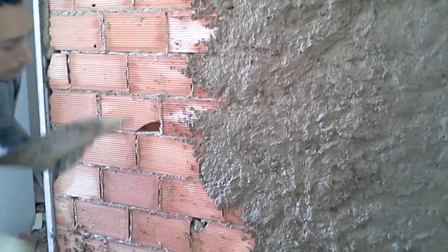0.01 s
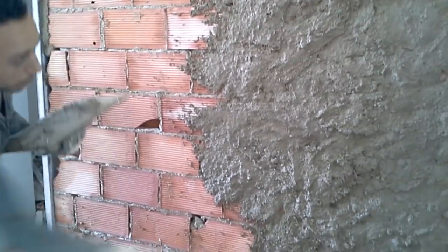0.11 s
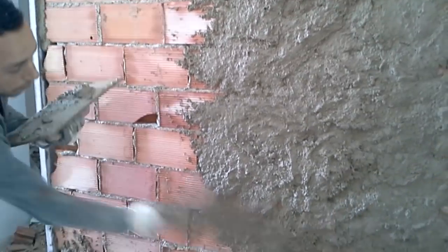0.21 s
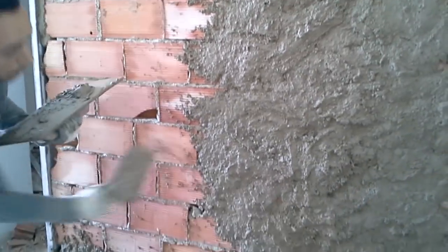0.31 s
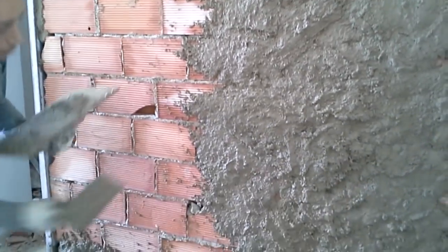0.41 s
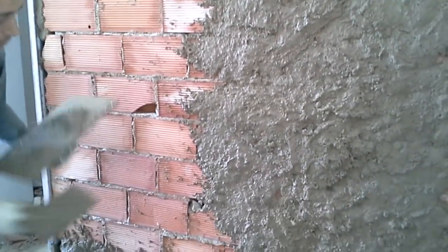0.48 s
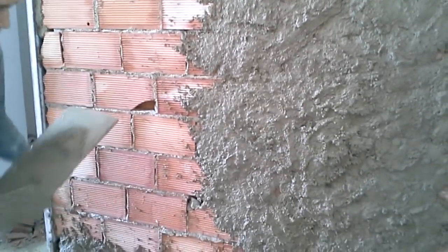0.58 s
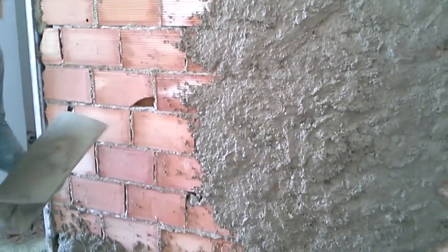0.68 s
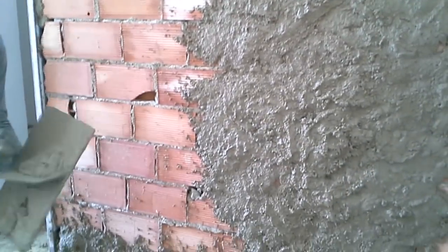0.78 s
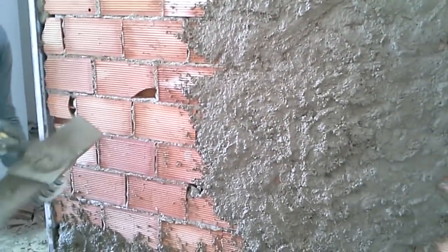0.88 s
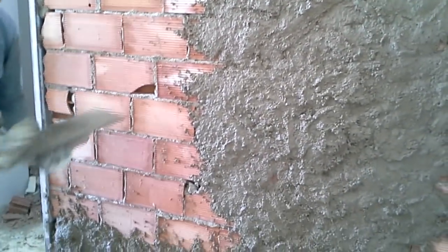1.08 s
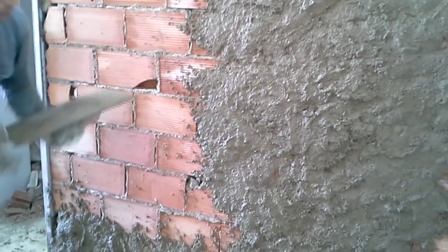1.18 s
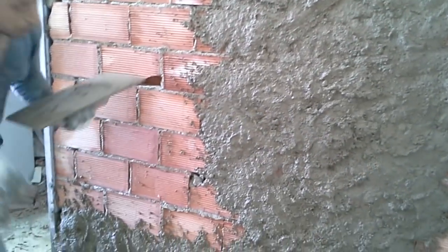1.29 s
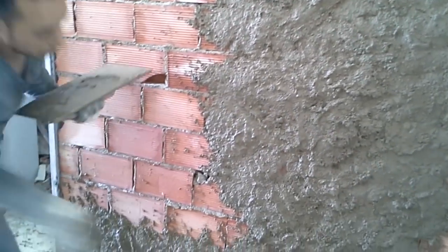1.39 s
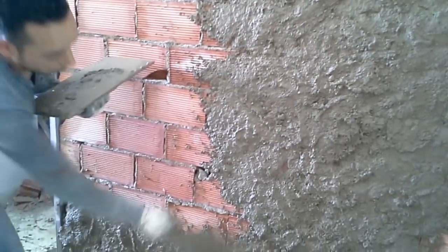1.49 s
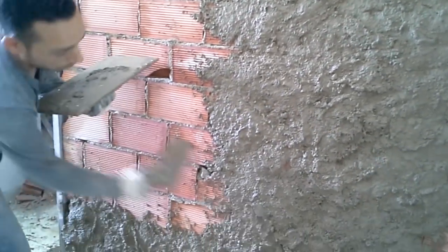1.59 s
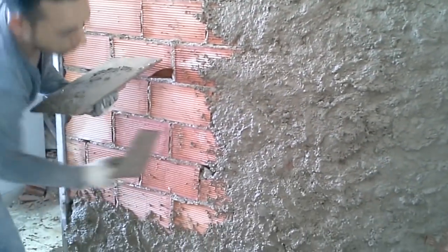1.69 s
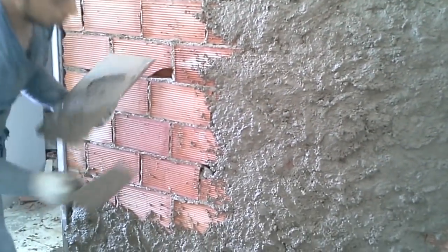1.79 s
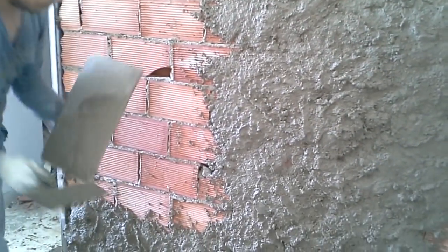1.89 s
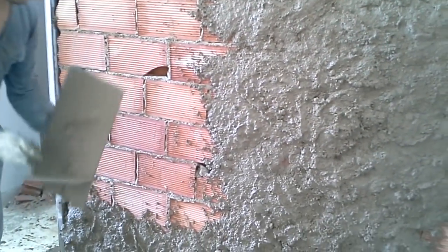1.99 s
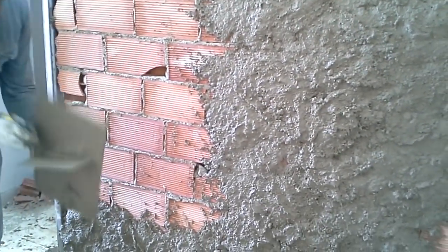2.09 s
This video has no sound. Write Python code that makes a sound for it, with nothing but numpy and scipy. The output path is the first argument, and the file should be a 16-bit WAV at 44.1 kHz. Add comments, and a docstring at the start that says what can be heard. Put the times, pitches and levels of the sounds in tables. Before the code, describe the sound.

One sharp wet slap of cement on hollow brick, with gritty, ringing steel trowel scrapes on a hand board before and after, tiny crumb ticks and faint site noise, close stereo phone in a hard bare room.

```python
"""A plasterer in a bare brick room, close to a phone. Faint rumble, site noise and the rustle of clothes (coloured
noise) run throughout. Two crumbs tick, then the trowel scrapes the hand board: random sand grains and edge knocks
ring board and steel blade, and the grains hiss. Two more crumbs tick; wet cement slides off the flicked blade and
slaps on the wall as noise bursts, with a thud and a ringing brick. Last the trowel digs and drags over the board
again. The hard room answers strokes, crumbs and cement with a tail of about half a second."""
import sys
import numpy as np
from scipy import signal
from scipy.fft import rfft, irfft, next_fast_len
from scipy.io import wavfile
from scipy.ndimage import uniform_filter1d

SR = 44100
rng = np.random.default_rng(int(sys.argv[2]) if len(sys.argv) > 2 else 0)


def ratio(d):
    """dB to gain"""
    e = np.asarray(d, float) / 20
    return 10 ** e


def store_pcm(level_fs):
    """Save levels as 16-bit WAV."""
    pcm = np.round(np.clip(level_fs, -1, 1) * 32767).astype(np.int16)
    wavfile.write(sys.argv[1], SR, np.atleast_2d(pcm).T)


N = 92610
T = np.arange(N) / SR
GRAINS_PER_S, GRAIN_SPREAD_DB = 7000, 2.2  # sand in the mix, under the blade and in the splat


def on_hz(table, hz):
    """Reads a table on a log-frequency axis."""
    points = np.array(table, float)
    return np.interp(np.log(np.maximum(hz, 1)), np.log(points[:, 0]), points[:, 1])


def curve(table, col):
    """Gain along a dB column against time; silent outside the table."""
    points = np.array(table, float)
    inside = (T >= points[0, 0]) * (T <= points[-1, 0])
    return ratio(np.interp(T, points[:, 0], points[:, col])) * inside


def colour(x, table):
    """Minimum-phase filter with the table's spectrum, scaled to unit gain for white noise."""
    log_gain = on_hz(table, np.fft.rfftfreq(2048, 1 / SR)) * np.log(10) / 20
    cepstrum = irfft(log_gain)
    # folding the cepstrum forward makes the response causal
    cepstrum[1:1024] = 2 * cepstrum[1:1024]
    cepstrum[1025:] = 0
    response = irfft(np.exp(rfft(cepstrum)))
    return signal.fftconvolve(x, response / np.sqrt(np.sum(response ** 2)))[:N]


def ring(x, modes):
    """Damped modes of a body, each dying faster the wider it is; unit gain for white noise."""
    t = T[:SR // 5]
    response = 0
    for k, (pitch_hz, width_hz, peak_db) in enumerate(modes):
        decay = width_hz * np.exp(-np.pi * width_hz * t)
        mode = ratio(peak_db) * decay * np.sin(2 * np.pi * pitch_hz * t)
        response = response + (-1) ** k * mode
    return signal.fftconvolve(x, response / np.sqrt(np.sum(response ** 2)))[:N]


def sand():
    """Dense random grains of either sign and uneven size, rms 1."""
    chance, sign, size = rng.random((3, N))
    size_db = -GRAIN_SPREAD_DB * np.log(1 - size)
    grains = (chance < GRAINS_PER_S / SR) * np.sign(sign - .5) * ratio(size_db)
    return grains / grains.std()


def burst(start_s, t60_s):
    """Sudden start, exponential fall by 60 dB in t60_s."""
    return (T >= start_s) * np.exp(-np.log(1000) * np.maximum(T - start_s, 0) / t60_s)


def push(centre_s, width_s):
    """A short smooth force pulse, bell-shaped in time."""
    return np.exp(-.5 * ((T - centre_s) / width_s) ** 2)


# likeness of the sound at the two ports: pitch_hz [Hz], likeness [0-1]
LIKENESS = [(100, 0.9), (600, 0.72), (1200, 0.023), (3000, 0.0046), (12000, 0.018)]


def stereo(length):
    """Two noises alike in the bass, nearly unrelated in the treble."""
    mid, side = rfft(rng.standard_normal((2, length)))
    likeness = np.clip(on_hz(LIKENESS, np.fft.rfftfreq(length, 1 / SR)), 0, 1)
    mid = mid * np.sqrt((1 + likeness) / 2)
    side = side * np.sqrt((1 - likeness) / 2)
    return irfft(mid + side * np.array([[1], [-1]]), length)


# low rumble over time: start_s [s], level_db [dB]
RUMBLE = [(0, -41), (0.06, -51.5), (0.15, -62), (0.22, -39), (0.7, -76.5), (0.95, -63.5), (1.4, -57.5),
          (1.6, -47), (1.7, -68), (2.1, -72)]
# spectrum of the rumble: pitch_hz [Hz], level_db [relative dB per Hz]
RUMBLE_COLOUR = [(30, -54), (90, -11), (150, 8.5), (260, -5.5), (1000, -114)]
# site noise over time: start_s [s], level_db [dB]
SITE = [(0, -34.5), (0.06, -42), (0.12, -47.5), (0.6, -51), (0.9, -53), (1.45, -53), (2.1, -47)]
# spectrum of the site noise: pitch_hz [Hz], level_db [relative dB per Hz]
SITE_COLOUR = [(100, -11.5), (220, -10.5), (666, -3), (1600, -7.5), (4250, -14), (14600, -39)]
# bright rustle over time: start_s [s], level_db [dB]
RUSTLE = [(0, -53.5), (0.1, -49.5), (0.19, -43), (0.72, -55.5), (0.76, -49), (0.86, -54.5), (0.93, -58.5),
          (1.45, -52), (2.02, -52), (2.1, -47.5)]
# spectrum of the rustle: pitch_hz [Hz], level_db [relative dB per Hz]
RUSTLE_COLOUR = [(700, -32), (1900, -3), (3000, -11), (4900, -1.5), (6500, -8.5), (14600, -18.5)]


def site():
    """Rumble, distant noise and bright rustle: coloured stereo noises, each wavering a little."""
    out = 0
    for level, tone in ((RUMBLE, RUMBLE_COLOUR), (SITE, SITE_COLOUR), (RUSTLE, RUSTLE_COLOUR)):
        steps = np.repeat(rng.standard_normal(N // 600 + 1), 600)
        flutter = uniform_filter1d(steps, 600)[:N]
        noise = np.array([colour(side, tone) for side in stereo(N)])
        out = out + curve(level, 1) * ratio(2.3 * flutter) * noise
    return out


# small crumbs falling: start_s [s], level_db [dB before the mix]
CRUMBS = [(0.125, -35), (0.157, -44), (0.7363, -26.5), (0.746, -29.5)]
# spectrum of a crumb: pitch_hz [Hz], level_db [relative dB per Hz]
CRUMB_COLOUR = [(800, -2), (1500, 1), (3800, 0.5), (4600, -9), (14000, -28)]


def crumbs():
    """Each crumb ticks: a noise burst that dies in milliseconds."""
    ticks = sum(ratio(level_db) * burst(start_s, 0.0072) for start_s, level_db in CRUMBS)
    return colour(ticks * rng.standard_normal(N), CRUMB_COLOUR)


# the two trowel strokes: start_s [s], board_db, blade_db, grit_db [dB before the filters]
STROKES = [
    [(0.197, -26, -63, -32.5), (0.206, -6.5, -48, -20), (0.23, -10, -49, -22.5), (0.246, -6.5, -21, -15),
     (0.264, -6.5, -32, -16.5), (0.28, -16, -20.5, -26), (0.292, -63, -15.5, -25), (0.315, -78, -86, -22)],
    [(1.531, -48, -50, -41), (1.536, -12, -19, -14), (1.55, -27, -38, -23), (1.569, -18, -46, -15.5),
     (1.575, -50, -15.5, -9), (1.61, -8, -16, -20), (1.64, -15.5, -17.5, -15), (1.67, -56, -30, -16.5),
     (1.75, -21.5, -24.5, -20), (1.79, -43, -19.5, -52), (1.86, -74, -40, -34)],
]
# blade edge knocking the board: centre_s [s], board_db, blade_db [dB before the modes], width_s [s]
KNOCKS = [(0.2015, -11.5, -17.5, 0.00024), (0.2105, -7.5, -5.5, 0.00016), (0.254, -10, -11, 0.00014),
          (1.5334, -51, -10.5, 0.00043), (1.548, -34, -9.5, 0.00018), (1.5726, 1, -3, 0.000098),
          (1.588, -1.5, 2, 0.00004)]
# hand board ringing under the trowel: pitch_hz [Hz], width_hz [Hz], peak_db [relative dB]
BOARD = [(256.6, 28, -11.5), (630.4, 40, 1.5), (763, 22, -0.5), (921, 35, -2), (1140, 40, -19),
         (1486, 36.5, -3.5), (2015, 54, -15), (2847, 21.4, -10), (4840, 110, -24)]
# steel blade ringing as it drags free: pitch_hz [Hz], width_hz [Hz], peak_db [relative dB]
BLADE = [(346, 71, -0.5), (553.5, 45, 3), (807, 73, 2.5), (975, 17, 6.5), (1051.5, 17, 4.5), (1136, 48, 7),
         (2005, 140, -10.5)]
# hiss of sand under steel: pitch_hz [Hz], level_db [relative dB per Hz]
GRIT = [(170, -8.5), (400, -13), (1000, 3), (2200, -0.5), (4000, -6), (7000, -11.5), (11000, -19.5),
        (14600, -28)]


def trowel():
    """Sand and edge knocks ring board and blade, and the grains hiss; bodies too small for bass."""
    board_sand, blade_sand, grit = [
        sum(curve(stroke, col) for stroke in STROKES) * sand() for col in (1, 2, 3)]
    board_knock, blade_knock = [
        sum(ratio(knock[col]) * push(knock[0], knock[3]) for knock in KNOCKS) for col in (1, 2)]
    rings = ring(board_sand + board_knock, BOARD) + ring(blade_sand + blade_knock, BLADE)
    hiss = colour(grit, GRIT)
    no_bass = signal.butter(5, 185, "high", fs=SR, output="sos")  # Hz
    return signal.sosfilt(no_bass, [rings, hiss])


# cement sliding off the flicked blade: start_s [s], level_db [dB before the mix]
SLIDE = [(0.965, -61), (0.99, -44), (1.012, -32.5), (1.04, -32)]
# spectrum of the slide: pitch_hz [Hz], level_db [relative dB per Hz]
SLIDE_COLOUR = [(200, -64), (500, -1), (900, 3.5), (2200, 1.5), (4100, 1.5), (8000, -6), (14600, -11)]


def slide():
    """The load slips off the steel: a swelling coloured noise."""
    return colour(curve(SLIDE, 1) * rng.standard_normal(N), SLIDE_COLOUR)


# lumps landing: start_s [s], splat_db, thud_db [dB before the filters], splat_t60_s [s]
LUMPS = [(1.04, -1.5, -17.5, 0.046), (1.076, -15, -16, 0.028), (1.089, -14.5, -21, 0.078)]
# wet cement on brick: pitch_hz [Hz], level_db [relative dB per Hz]
SPLAT = [(100, -49), (200, -9), (600, 0.5), (970, 4), (1850, 3), (3600, -2), (4600, -2.5), (7500, -11),
         (14600, -27.5)]
# duller thud of the wall: pitch_hz [Hz], width_hz [Hz], peak_db [relative dB]
THUD = [(95.6, 20, 2), (146.6, 35, 2.5), (302, 45, 1), (392, 6.7, -2)]


def lumps():
    """Each lump bursts into dying grain noise and pushes the wall's low modes."""
    splat = sum(ratio(splat_db) * burst(start_s, t60_s) for start_s, splat_db, _, t60_s in LUMPS)
    width_s = 0.00017
    thud = sum(ratio(thud_db) * push(start_s + 2 * width_s, width_s) for start_s, _, thud_db, _ in LUMPS)
    return colour(splat * sand(), SPLAT) + ring(thud, THUD)


# hollow brick ringing: pitch_hz [Hz], width_hz [Hz], peak_db [relative dB]
BRICK = [(3130, 200, 0.008), (3840, 230, 0)]


def brick():
    """The first lump's smack, a very short noise burst, rings a hollow brick."""
    smack = ratio(-2) * burst(LUMPS[0][0], 0.0072) * rng.standard_normal(N)
    return ring(smack, BRICK)


# reverberation time of the room: pitch_hz [Hz], t60_s [s]
ROOM_T60 = [(80, 0.74), (250, 0.67), (2000, 0.46), (5000, 0.44), (12000, 0.34)]
# room level against the direct sound: pitch_hz [Hz], level_db [dB before the build-up]
ROOM_DB = [(100, -3), (700, 2.5), (2000, 5.5), (12000, 9)]


def room(x):
    """Diffuse tail: noise that builds up after the first wall, every band dying at its own rate."""
    first_wall_s, build_s = 0.00067, 0.00077
    hz, t, bands = signal.stft(stereo(SR), SR, nperseg=256)
    fall = np.exp(-np.log(1000) * t / on_hz(ROOM_T60, hz)[:, None])
    energy = np.sum(fall ** 2, axis=1) * SR * t[1]
    fall = fall * (ratio(on_hz(ROOM_DB, hz)) / np.sqrt(energy))[:, None]
    tail = signal.istft(bands * fall, SR, nperseg=256)[1][:, :SR]
    tail = tail * (1 - np.exp(-np.maximum(T[:SR] - first_wall_s, 0) / build_s))
    return signal.fftconvolve(x[None], tail, axes=1)[:, :N]


def scene():
    """Direct sound plus its room tail, over the site noise."""
    trowel_rings, hiss = trowel()
    rest = hiss + lumps() + crumbs() + slide()
    rings = trowel_rings + brick()
    # board, blade and brick ring towards the phone, 5 dB less into the room
    tail = room(rest + ratio(-5) * rings)
    return ratio(-4) * (rings + rest + tail) + site()


# phone ports, left minus right: pitch_hz [Hz], level_db [dB]
BALANCE_DB = [(100, -1.5), (700, -2.5), (1250, -.6), (2300, 4.3), (4200, 10), (7700, 7), (14200, 0.9)]


def phone_ports(x):
    """The two ports differ most in the treble, each taking half the difference in dB."""
    size = next_fast_len(N + 4096)
    tilt = on_hz(BALANCE_DB, np.fft.rfftfreq(size, 1 / SR)) / 2
    return irfft(rfft(x, size) * ratio(np.array([tilt, -tilt])), size)[:, :N]


def roll_off(x):
    """The treble ends steeply here."""
    return signal.sosfilt(signal.butter(12, 14760, fs=SR, output="sos"), x)


def record(dry):
    """Through the phone's ports: no deep bass, no top treble, peaks clipped at full scale."""
    x = phone_ports(dry)
    x = signal.sosfilt(signal.butter(4, 66, "high", fs=SR, output="sos"), x)
    x = signal.sosfilt(signal.ellip(10, .2, 60, 14600, fs=SR, output="sos"), x)
    return roll_off(np.clip(x, -1, 1))


dry = scene()
out = record(dry)
store_pcm(out)
```